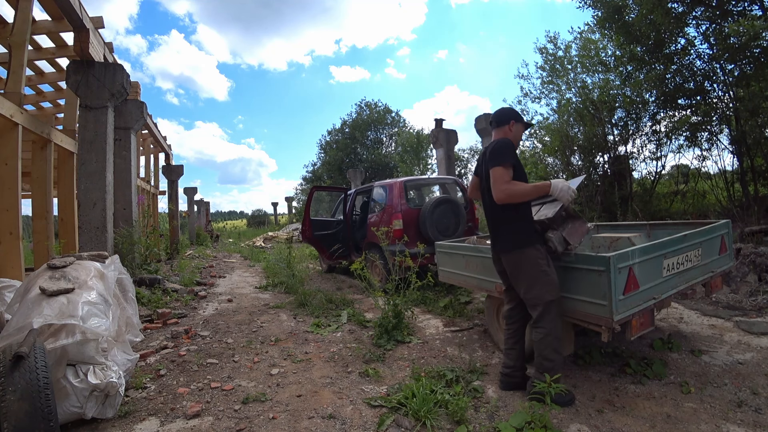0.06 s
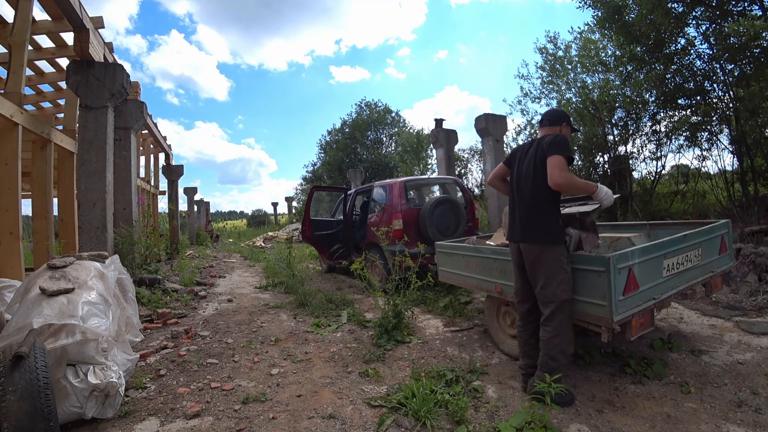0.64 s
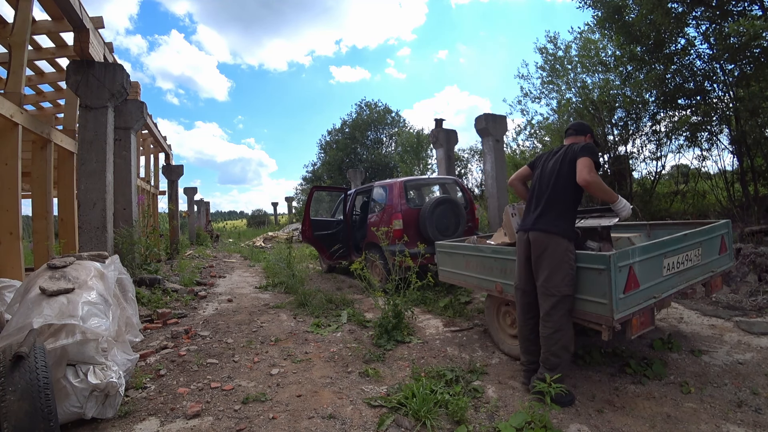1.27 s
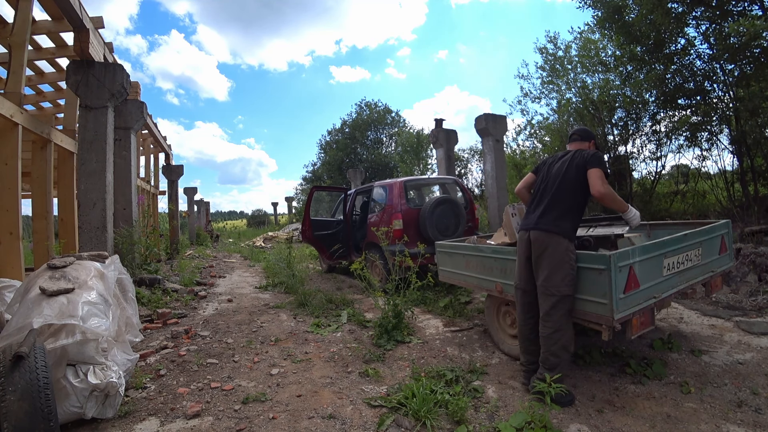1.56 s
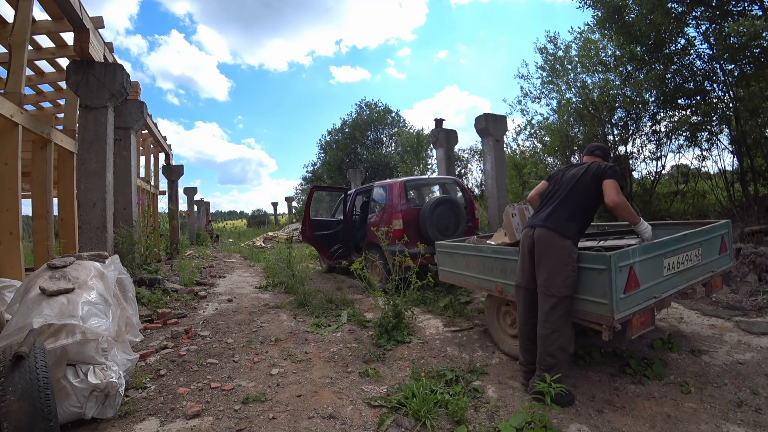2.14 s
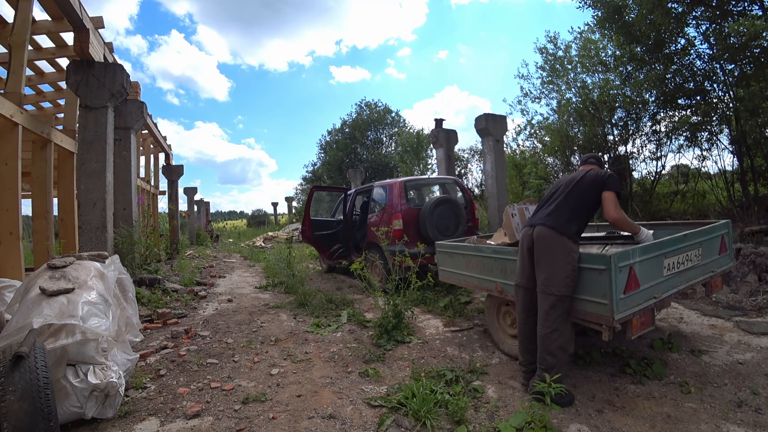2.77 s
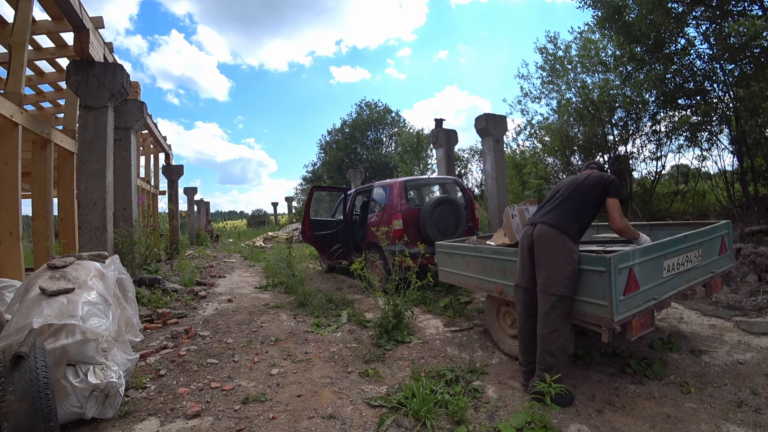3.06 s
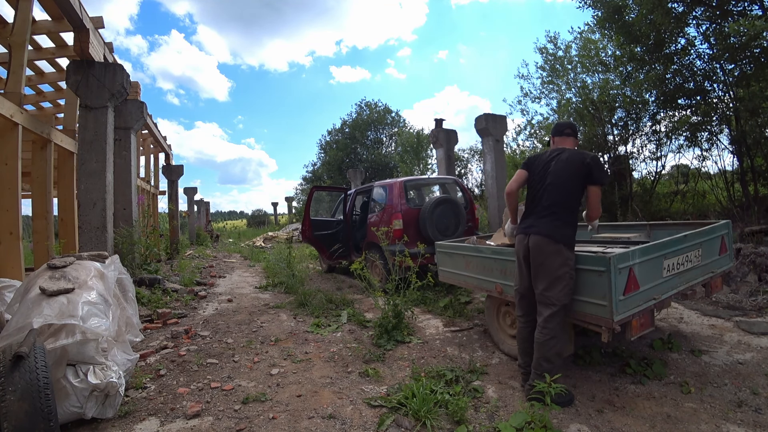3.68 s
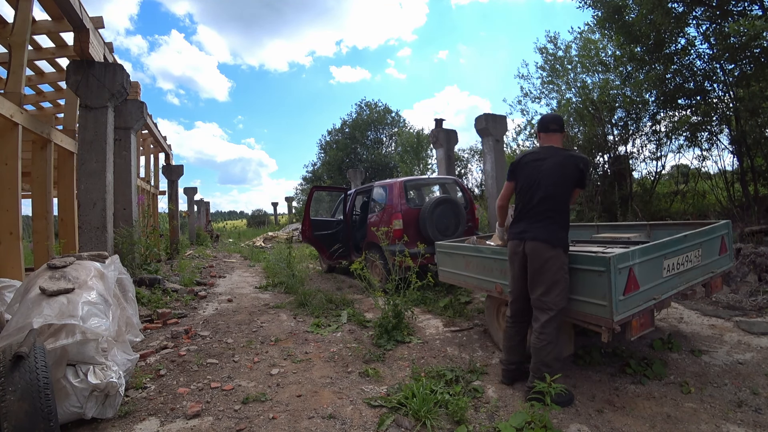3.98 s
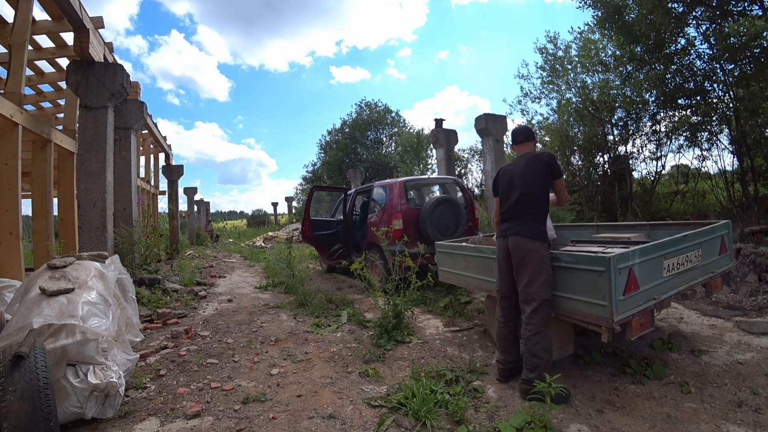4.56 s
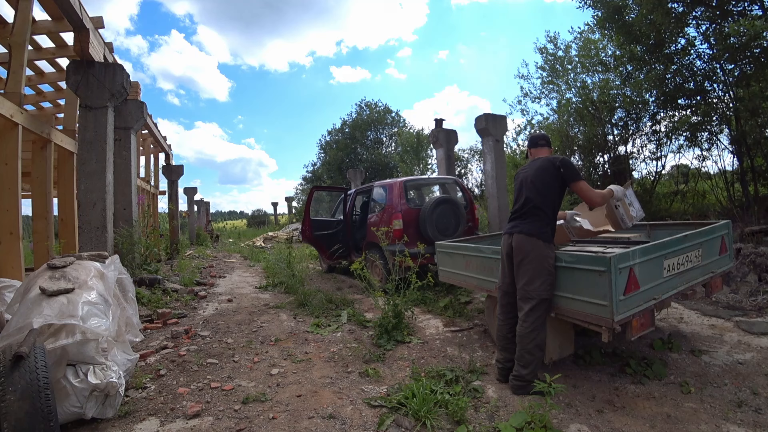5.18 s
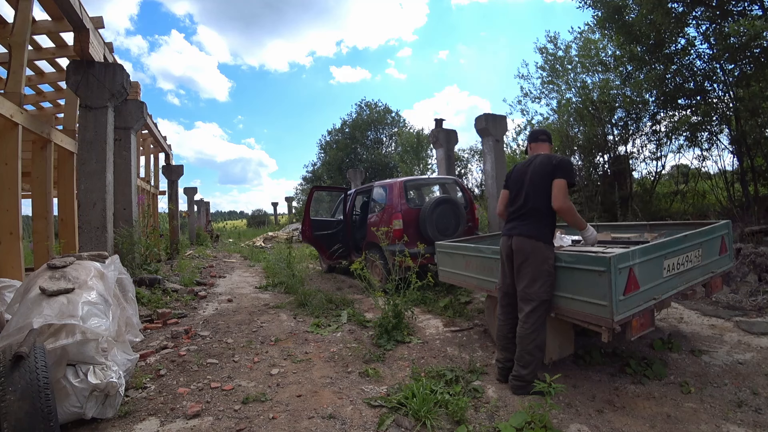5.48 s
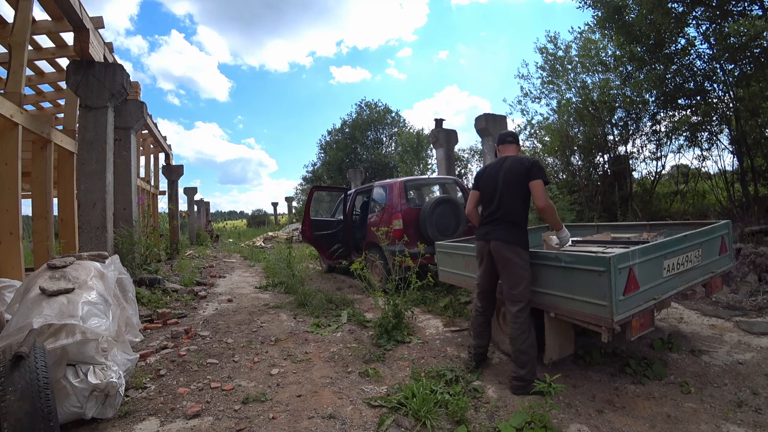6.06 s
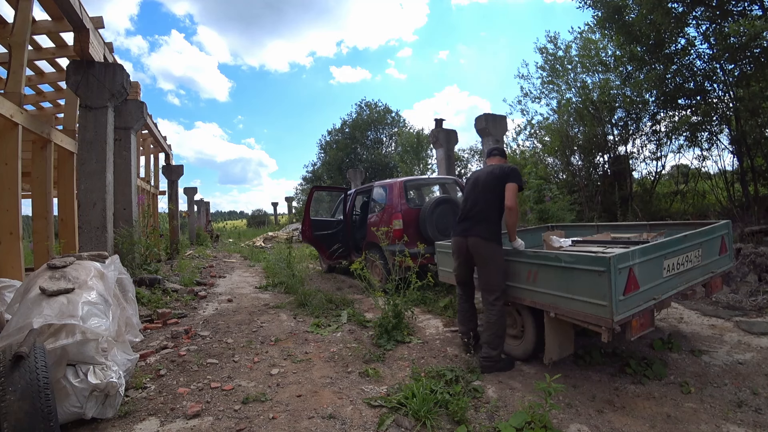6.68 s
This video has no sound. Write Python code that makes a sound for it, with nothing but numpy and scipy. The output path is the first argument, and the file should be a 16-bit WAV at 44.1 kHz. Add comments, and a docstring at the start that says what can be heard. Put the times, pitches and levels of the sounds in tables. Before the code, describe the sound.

Right at the start, heavy slabs land and scrape on the sheet-metal bed of a small trailer, a few metres from the microphone. The floor booms and chatters, and loose side boards tick until about 1 second. Light clacks and slides follow, with a moderate thud near 1.7 seconds and more gritty scraping up to 2.6 seconds. From 2.8 to 3.4 seconds comes the loudest stretch: a quick cluster of booming blows, clacks and hard shoves, with stone chips snapping and grit cracking. The boards rattle briefly as the ringing fades. Shoes scuff faintly on gritty ground between 4 and 5 seconds, with two small knocks. At 5.3 seconds another slab touches down, then lands with a loud, ringing thud. Soft steps and a light clack near 6.5 seconds close it. The open yard gives a short stereo echo over quiet air and faint microphone hiss.

```python
"""Heavy slabs dropped and shoved onto the sheet-metal bed of a small trailer, a few metres off the mic.
Each blow booms in the floor panel and chatters as the load rebounds. Slabs clack, scrape and crush grit,
stone chips snap, and loose side boards tick as the trailer rocks. Between loads, shoes scuff on gritty
ground. Stereo, in an open yard with a short echo, over quiet air and faint microphone hiss."""
import sys
import numpy as np
from scipy import signal
from scipy.fft import rfft, irfft, next_fast_len
from scipy.io import wavfile

SR = 44100
rng = np.random.default_rng(int(sys.argv[2]) if len(sys.argv) > 2 else 0)


def put_to_file(sound):
    """Save the sound as 16-bit audio at rate SR, in the file named by the first command-line argument."""
    columns = np.atleast_2d(sound).T  # one column per channel
    safe = np.clip(columns, -1, 1)
    whole_steps = np.round(safe * 32767)
    wavfile.write(sys.argv[1], SR, whole_steps.astype(np.int16))


N = 305613

# Spectra of the yard's air with mic hiss, of grit underfoot and of scraping slabs.
# Each row: frequency in Hz, spectral density in dB.
AIR_SPECTRUM = [(25, -17), (70, -1.5), (160, 2.5), (500, -7), (1000, -8), (2000, -13), (4500, -19),
                (6300, -21), (7800, -17), (9200, -23.5), (12000, -22), (15500, -26)]
GRIT_SPECTRUM = [(40, 6), (160, 8), (300, 4.5), (480, 7), (750, -2), (1100, -5.5), (2400, -15),
                 (5000, -25.5), (9000, -34), (15000, -46)]
SLAB_SPECTRUM = [(50, 6), (150, 11.5), (280, 6), (450, 5.5), (1000, 2), (2200, -2.5), (5000, -11),
                 (9000, -23), (15000, -34)]
# Shoes on the ground. Each row: moment of hardest pressure in seconds, length in seconds, level in dB.
SCUFFS = [(4.099, 0.27, -43.5), (4.4, 0.43, -46.5), (4.587, 0.18, -51.5), (4.712, 0.11, -45),
          (4.844, 0.42, -55.5), (5.901, 0.11, -43), (6.025, 0.39, -51.5), (6.52, .12, -45.5),
          (6.825, .15, -52.5)]
# Single board buzzes and snapping stone chips. Each row: start in seconds, level in dB, centre in Hz.
BOARD_RATTLES = [(.676, -44.5, 4306), (.954, -46.5, 2110), (1.877, -41.5, 4070), (2.322, -45, 3690),
                 (3.387, -35, 5570), (5.617, -48, 4400), (5.788, -52.5, 5740)]
STONE_CHIPS = [(.778, -53, 1720), (2.861, -38, 9800), (2.955, -49, 9060), (3.131, -32, 8050),
               (3.252, -27, 7220), (5.859, -50, 2530), (5.911, -44.5, 2290), (6.006, -49, 4800),
               (6.083, -49, 1960)]
# Runs of buzzes as the trailer rocks. Each row: start, end and first gap in seconds, growth factor
# of the gap, first level in dB, fall in dB per second, centre in Hz.
ROCKING = [(0.339, .62, .053, 1.1, -37, 70, 3500), (3.509, 3.85, .058, 1.5, -40.5, 18, 1552)]
# Slabs sliding on the bed. Each row: moment of hardest pressure in seconds, length in seconds,
# level in dB, treble tilt in dB per octave.
SLIDES = [(.055, 0.15, -22, 1.5), (.165, 0.08, -27, 4), (.39, 0.27, -35.5, -2), (1, 0.14, -40, -4),
          (1.075, 0.071, -36, -0.5), (1.829, 0.31, -34, -1), (1.988, .26, -33.5, 1),
          (2.097, 0.28, -36, -7.5), (2.559, .22, -32, -1), (2.924, .27, -22, -2.5), (3.18, .2, -18.5, -1),
          (3.305, .11, -20, -.5)]
# Slab knocks that leave the floor still. Each row: start in seconds, level in dB, pitch factor
# from the slab's size, treble tilt in dB per octave.
CLACKS = [(1.045, -29, 1.86, -3), (1.221, -30.5, 1.16, 1.5), (1.245, -35, 0.98, 0.5),
          (2.062, -31.5, 1.2, -4.5), (2.866, -19, 0.84, -2), (3.131, -15, 1.16, 2), (3.303, -19.5, 1.2, 2),
          (4.582, -44, 0.79, -9.5), (4.763, -41, 0.83, 2.5), (5.402, -12, 1.1, -4.5),
          (6.498, -34.5, 1.08, 1.5), (6.540, -44.5, 1.3, 2.5)]
# Modes of a slab, and of the trailer's floor and sides.
# Each row: frequency in Hz, level in dB, t60 in seconds.
SLAB_MODES = [(342, -12, 0.15), (643, -1, 0.23), (724, -5, 0.22), (1000, -2, 0.057), (1150, -63, 0.018),
              (1512, -3.5, 0.091), (1800, -7, 0.095), (2330, -18, 0.045), (2850, -11.5, 0.086),
              (3660, -13, 0.038), (5530, -10, .06), (6950, -13, 0.017)]
PANEL_MODES = [(72.4, -1, 1), (94.9, -1, 0.25), (115.5, -18, 0.23), (150.95, -5, 1.57), (167.5, -3.5, 0.84),
               (201.2, -1, 0.28), (235.6, -7.5, 1.26), (293, -17.5, 1.2), (335.7, -9, 0.89),
               (380.4, -8, 0.64), (405, -4.5, 0.69), (454.5, -4.5, 0.87), (501.6, -4, 0.6),
               (532, -9.5, 0.82), (646, -13.5, 0.35), (775, -16, 1.14), (801, -7, 0.84), (951, -14.5, 0.66),
               (995, -7.5, 0.63), (1168, 4, 0.085), (1277, -12, 1.1), (2020, -7.5, .3), (2544, -6, 0.23),
               (2660, 0, 0.068), (3500, -58, 0.14)]
# The panel's crowd of weaker modes. Each row: frequency in Hz, band level in dB, first t60 in seconds,
# relative level of the lingering tail in dB, its t60 in seconds.
PANEL_CROWD = [(34.8, -21.5, 0.065, -11.5, 6.6), (76.6, 1.5, 0.32, -19.5, 2.56),
               (161, -5, 0.15, -12.5, 1.94), (260, -6.5, 0.35, -8.5, 1.24), (458, -8, 0.64, -15, 2.1),
               (970, -4.5, 0.34, -31.5, 1.85), (2200, -6.5, 0.27, -14.5, 0.7), (5300, 0, 0.073, -11, 0.43),
               (8600, -3.5, 0.032, -13.5, 0.42), (15500, -19, 0.19, -11, 0.19)]
# How each load lands, shared by its blows. Each row: start in seconds, frequency driven hardest in Hz,
# its boost in dB, drum mode boost in dB, share of the free t60, then rumble, boom and crack in dB
# relative to the clang.
LOADS = [(0, 401, 12.3, -3, 0.78, 0, -3, -6.5), (.26, 397, 9.3, -3.5, 0.56, -8.5, -3.5, -19.5),
         (1, 75.6, 2.3, 1, 1, 3.5, 0.5, -11), (1.6, 167.7, 9.2, 0, 0.27, -0.5, 7, -7),
         (2.4, 160, 4, 3, 0.58, 3.5, 7.5, 0), (2.8, 383, 6, 3.5, 0.47, -7.5, 2, -3),
         (3.05, 237.4, 5.4, -2.5, 0.42, -11, 2, -9.5), (5.3, 347, 10.8, -1, 0.41, -7.5, 6, -9.5),
         (5.39, 545, 4.6, 3.5, 0.77, -15, -2.5, -11)]
# Blows on the bed. Each row: time in seconds, clang level in dB.
BLOWS = [(0.016, -28.5), (.047, -32), (.102, -28.5), (.13, -26.5), (.28, -21.5), (.3, -23), (1.085, -43),
         (1.694, -29), (1.706, -27.5), (1.783, -33), (2.47, -41), (2.491, -40.5), (2.829, -17),
         (2.861, -21.5), (2.949, -26), (3.098, -16), (3.128, -20), (3.22, -18), (3.251, -17),
         (3.304, -26.5), (5.308, -27), (5.401, -16.5), (5.414, -20.5)]

TONE_HZ = [75, 160, 800, 4500]  # rumble, boom, clang, crack
BANDS_HZ = 32 * 2 ** (np.arange(19) / 2)
DRUM_HZ, WHOLE_FLOOR_HZ = 157, 180  # the floor's main drum mode; the limit below which it moves as one


def undb(db):
    """Decibels to gain."""
    return 10 ** (np.asarray(db) / 20)


def unit(x):
    """Scale to rms 1."""
    return x / np.sqrt(np.mean(x ** 2, axis=-1, keepdims=True))


def at(hz, points, values):
    """Read values on a log-frequency axis."""
    return np.interp(np.log(np.maximum(hz, 1)), np.log(points), values)


def fade(t, t60):
    """Exponential decay, 60 dB down after t60."""
    return np.exp(-np.log(1000) * t / np.maximum(t60, 1e-3))


def band(x, lo, hi, order=2):
    """Causal band-pass, edges in Hz."""
    sos = signal.butter(order, [lo, min(hi, SR / 2 - 1000)], "band", fs=SR, output="sos")
    return signal.sosfilt(sos, x)


def colour(x, spectrum, tilt_db=0):
    """Give a sound a spectrum, tilted per octave above 500 Hz."""
    size = next_fast_len(len(x))
    hz = np.maximum(np.arange(size // 2 + 1) * SR / size, 1)
    db = at(hz, *np.transpose(spectrum)) + tilt_db * np.log2(np.maximum(hz, 500))
    return irfft(rfft(x, size) * undb(db), size)[:len(x)]


def grains(count, per_s, spread_db):
    """Tiny random contacts of uneven strength."""
    impulses = (rng.random(count) < per_s / SR) * rng.choice([-1, 1], count)
    return impulses * undb(spread_db * np.minimum(rng.exponential(size=count), 4))


def add(track, s, sound):
    """Mix a sound in at s seconds."""
    start = max(int(s * SR), 0)
    track[start:start + len(sound)] += sound[:N - start]


def air(air_db=-60.5, sway_db=1, side_db=-9, whine_db=-79):
    """Quiet open air all round, with the mic's own hiss and a thin electronic whine."""
    sway = undb(sway_db * np.interp(np.arange(N) / SR, np.arange(30) / 4, rng.standard_normal(30)))
    mid = unit(colour(rng.standard_normal(N), AIR_SPECTRUM)) * sway
    side = undb(side_db) * unit(colour(rng.standard_normal(N), AIR_SPECTRUM, tilt_db=5.0))
    whine = unit(band(rng.standard_normal(N), 9940, 10060))
    return undb(air_db) * np.array([mid + side, mid - side]) + undb(whine_db) * whine


def yard(x, echo_db=-13.0, t60=0.2, port_lag_us=30.6, max_lag_rad=0.95):
    """Ground, walls and trees scatter a short, wide echo; direct sound reaches the left mic port later."""
    t = np.arange(SR // 3) / SR
    scatter = colour(rng.standard_normal(len(t)), [(60, -16), (250, 3), (1000, 12), (6000, 9)])
    scatter = scatter * fade(t, t60) * (t > .004)
    side = undb(echo_db) * signal.fftconvolve(x, scatter / np.linalg.norm(scatter))[:N]
    size = next_fast_len(N)
    hz = np.arange(size // 2 + 1) * SR / size
    # the body housing the mic limits the phase gap in the treble
    lag = np.minimum(2 * np.pi * hz * port_lag_us / 1e6, max_lag_rad)
    left = irfft(rfft(x, size) * np.exp(-1j * lag), size)[:N]
    return np.array([left + side, x - side])


def rub(strokes, rise_share, spectrum, per_s, spread_db, jerk_db, jerk_hz):
    """Rough faces catch and slip: dense grains that swell and die away, in jerks."""
    out = np.zeros(N)
    for hardest, length_s, db, tilt_db in strokes:
        t = np.arange(0, length_s, 1 / SR)
        pressure = np.interp(t / length_s, [0, rise_share, 1], [0, 1, 0])
        jerks = np.interp(t * jerk_hz, np.arange(200), rng.standard_normal(200))
        contacts = grains(len(t), per_s, spread_db) * undb(jerk_db * jerks)
        friction = unit(colour(contacts, spectrum, tilt_db))
        add(out, hardest - rise_share * length_s, undb(db) * pressure * friction)
    return out


def shoes(tilt_db=4.2):
    """Soles bear down and drag over gritty ground, faint at the mic."""
    steps = [(*step, tilt_db) for step in SCUFFS]
    return rub(steps, rise_share=.26, spectrum=GRIT_SPECTRUM,
               per_s=3000, spread_db=0.5, jerk_db=3.5, jerk_hz=72.4)


def ticks(events, t60, click_db, click_t60=0.005, width=1.68):
    """Small parts click once and buzz for an instant."""
    out, t = np.zeros(N), np.arange(SR // 4) / SR
    envelope = fade(t, t60) + undb(click_db) * fade(t, click_t60) / 2
    for s, db, hz in events:
        buzz = unit(grains(len(t), per_s=15000, spread_db=3.5))
        add(out, s, undb(db) * unit(band(buzz, hz / width, hz * width)) * envelope)
    return out


def side_boards():
    """Loose boards buzz singly, or in runs that slow and weaken as the trailer comes to rest."""
    runs = []
    for start, end, gap_s, growth, db, fall_db, hz in ROCKING:
        delays = np.cumsum([0, *(gap_s * growth ** np.arange(10))])
        runs += [(start + delay, db - fall_db * delay, hz) for delay in delays if start + delay < end]
    return ticks(BOARD_RATTLES + runs, t60=0.14, click_db=-0.5)


def stone_chips():
    """Chips of stone snap with a hard click."""
    return ticks(STONE_CHIPS, t60=0.059, click_db=18)


def crushed_grit(per_s=36, relative_db=-15.5, spread_db=2.5, centre_hz=4760):
    """Grit cracks at random under each sliding slab, more weakly under a soft or dull slide."""
    cracks = []
    for hardest, length_s, db, tilt_db in SLIDES:
        for when, size, octaves in rng.uniform(-0.91, 1, (16, 3))[:int(per_s * length_s)]:
            crack_db = db + relative_db + spread_db * size + 2 * min(tilt_db, 0)
            cracks.append((hardest + when * length_s / 3, crack_db, centre_hz * 2 ** octaves))
    return ticks(cracks, t60=0.057, click_db=-2.5)


def slides(ring_db=-7):
    """A sliding slab scrapes and sets the panel singing."""
    scrape = rub(SLIDES, rise_share=.39, spectrum=SLAB_SPECTRUM,
                 per_s=4000, spread_db=1.0, jerk_db=3.0, jerk_hz=112.5)
    t = np.arange(SR // 2) / SR
    drive = band(scrape, 174, 5950, order=1)  # the rough face passes on little bass
    panel = sum(undb(db) * np.sin(2 * np.pi * hz * t) * fade(t, t60) for hz, db, t60 in PANEL_MODES)
    return scrape + undb(ring_db) * scrape.std() * unit(signal.fftconvolve(drive, panel)[:N])


def clacks(crunch_db=-3, crunch_t60=0.11, ring_db=-6):
    """A slab knocked on its edge rings briefly in its own modes, with a crunch at the contact."""
    out, t = np.zeros(N), np.arange(SR // 3) / SR
    hz, mode_db, t60 = np.transpose(SLAB_MODES)[:, :, None]
    for s, db, pitch, tilt_db in CLACKS:
        gains = undb(mode_db + tilt_db * np.log2(hz / 1000)) * rng.choice([-1, 1], hz.shape)
        ring = np.sum(gains * np.sin(2 * np.pi * pitch * hz * t) * fade(t, t60), axis=0)
        grit = band(grains(len(t), per_s=9200, spread_db=-0.5), 265, 10400)
        crunch = unit(colour(grit, SLAB_SPECTRUM, tilt_db)) * fade(t, crunch_t60)
        add(out, s, undb(db) * (undb(ring_db) * ring + undb(crunch_db) * crunch))
    return out


def panel_modes(t, t60_share, swell_cycles):
    """Each strong mode swells over its first cycle and dies; a load on the panel shortens the ring."""
    hz, _, t60 = np.transpose(PANEL_MODES)[:, :, None]
    return np.sin(2 * np.pi * hz * t) * (1 - np.exp(-hz * t / swell_cycles)) * fade(t, t60_share * t60)


def chatter(ring, t60=0.48, share=0.34):
    """The load rebounds in quick, dying contacts, each too light to move the bass."""
    t = np.arange(SR // 3) / SR
    contacts = grains(len(t), per_s=500, spread_db=5.0) * fade(t, t60) * (t > .002)
    contacts *= share / (np.linalg.norm(contacts) + 1e-9)
    return ring + signal.fftconvolve(band(ring, 770, 14400), contacts)[:len(ring)]


def blows(panel_db=-3, scatter_db=-1.2, snap_db=1, snap_t60=0.019,
          ring_s=1.3, swell_cycles=0.29, contact_s=.003, spot_width=0.12):
    """Slabs hit the bed a few metres off: strong modes over a dense crowd that drops, then lingers."""
    t = np.arange(int(ring_s * SR)) / SR
    points, *columns = np.transpose(PANEL_CROWD)
    crowd_db, first_t60, linger_db, linger_t60 = (at(BANDS_HZ, points, c)[:, None] for c in columns)
    # bending waves need part of a cycle to spread, so the bass arrives late
    swell = 1 - np.exp(-t * BANDS_HZ[:, None] / swell_cycles)
    envelopes = (fade(t, first_t60) + undb(linger_db) * fade(t, linger_t60)) * swell
    edge = 2 ** (1 / 4)  # half-octave bands
    noise = np.array([band(rng.standard_normal(2 * len(t)), hz / edge, hz * edge, order=3)
                      for hz in BANDS_HZ])
    mode_hz, mode_db, _ = np.transpose(PANEL_MODES)
    near = lambda hz: np.exp(-(np.log(mode_hz / hz) / spot_width) ** 2)
    snap = undb(snap_db) * unit(band(rng.standard_normal(len(t)), 900, 5500, order=1)) * fade(t, snap_t60)
    attack = 1 - np.exp(-t / contact_s)
    out = np.zeros(N)
    for s, db in BLOWS:
        load = [row for row in LOADS if row[0] <= s][-1]
        _, spot_hz, spot_db, drum_db, t60_share, rumble_db, boom_db, crack_db = load
        tone_db = [db + rumble_db, db + boom_db, db, db + crack_db]
        offset = rng.integers(len(t))
        bands = noise[:, offset:offset + len(t)] * envelopes
        band_gains = undb(panel_db + crowd_db[:, 0] + at(BANDS_HZ, TONE_HZ, tone_db))
        band_gains *= np.linalg.norm(envelopes, axis=1) / np.linalg.norm(bands, axis=1)
        crowd = band_gains @ bands
        drive_db = at(mode_hz, TONE_HZ, tone_db) + spot_db * near(spot_hz) + drum_db * near(DRUM_HZ)
        # every blow pushes the whole floor down; where it happens to land sets the higher modes' signs
        signs = np.where(mode_hz < WHOLE_FLOOR_HZ, -1, rng.choice([-1, 1], len(mode_hz)))
        mode_gains = undb(panel_db + mode_db + drive_db + scatter_db * rng.standard_normal(len(mode_hz)))
        modes = (signs * mode_gains) @ panel_modes(t, t60_share, swell_cycles)
        ring = (crowd + modes + undb(db + crack_db) * snap) * attack
        add(out, s - contact_s, chatter(ring))
    return out


def scene():
    """Trailer and footsteps in the open yard, heard from one mic position."""
    steps = shoes()
    boards = side_boards()
    trailer = blows() + clacks() + boards + slides() + stone_chips()
    return air() + yard(trailer + steps + crushed_grit())


def record(dry, ceiling=0.42, top_hz=15850):
    """The recorder rounds the loudest peaks and cuts the top."""
    rounded = ceiling * np.tanh(dry / ceiling)
    return signal.sosfilt(signal.ellip(8, .2, 70, top_hz, fs=SR, output="sos"), rounded)


dry = scene()
out = record(dry)
put_to_file(out)
```